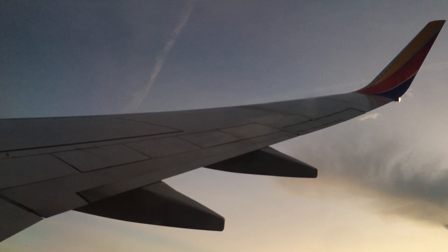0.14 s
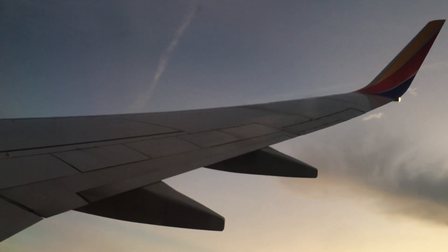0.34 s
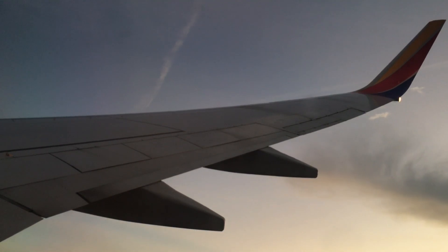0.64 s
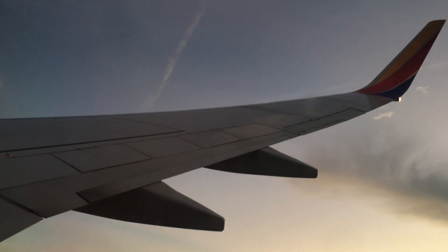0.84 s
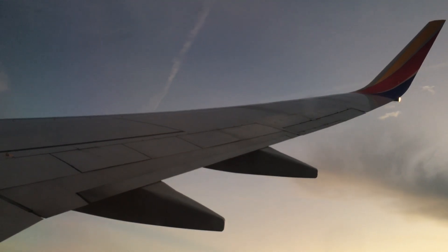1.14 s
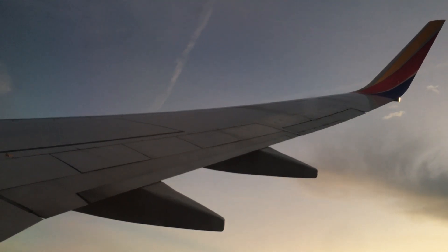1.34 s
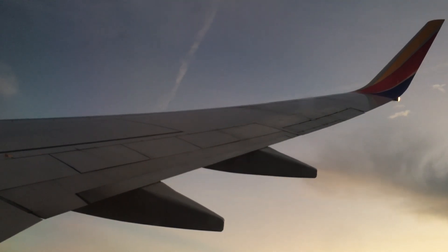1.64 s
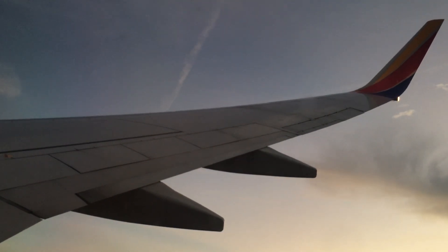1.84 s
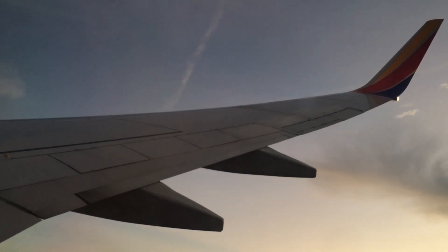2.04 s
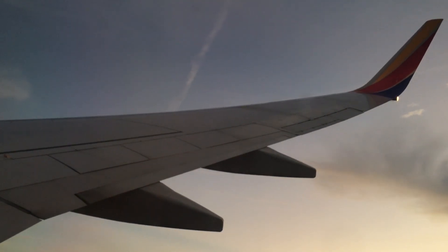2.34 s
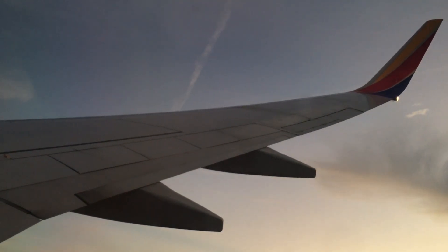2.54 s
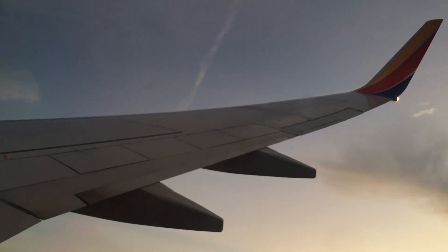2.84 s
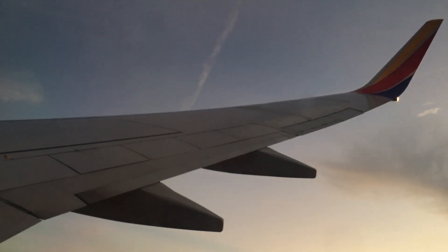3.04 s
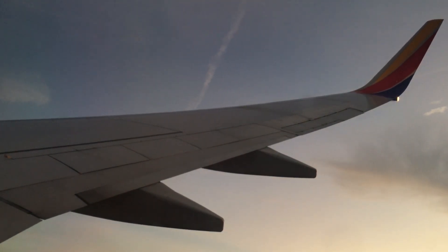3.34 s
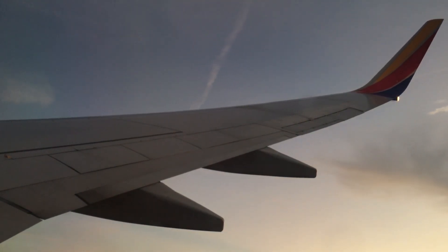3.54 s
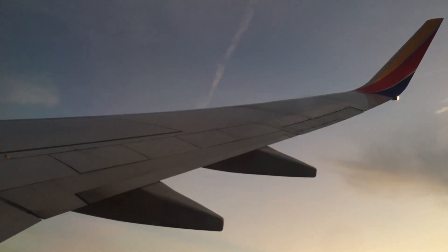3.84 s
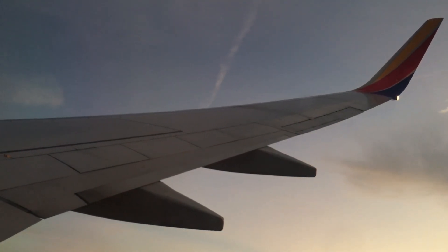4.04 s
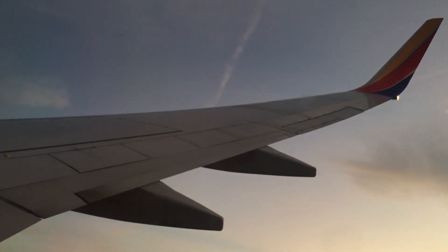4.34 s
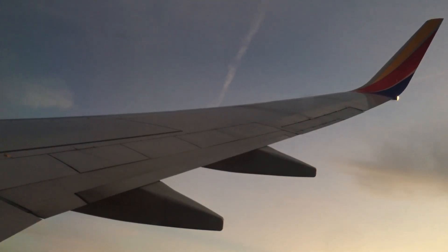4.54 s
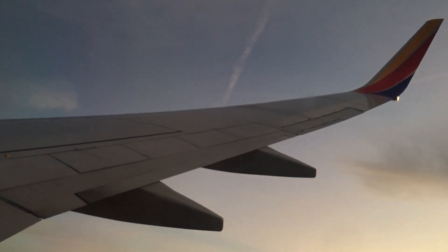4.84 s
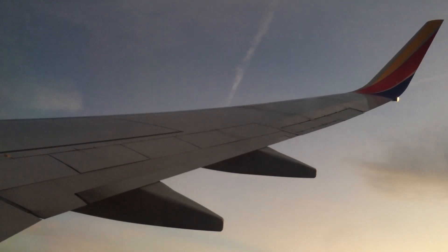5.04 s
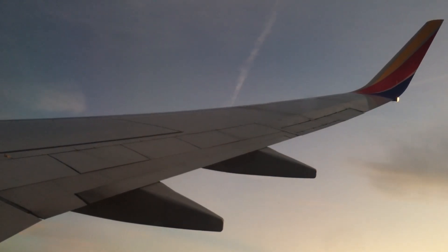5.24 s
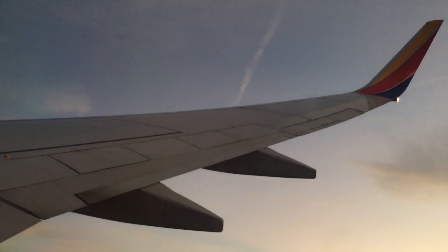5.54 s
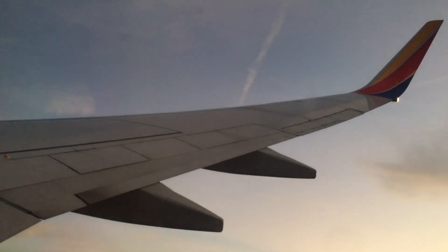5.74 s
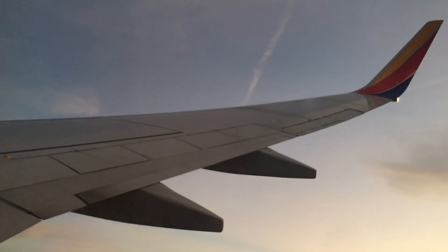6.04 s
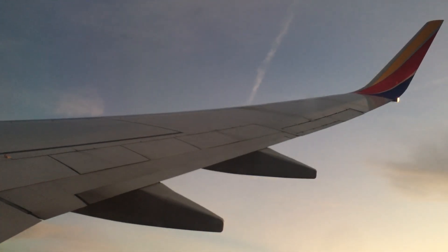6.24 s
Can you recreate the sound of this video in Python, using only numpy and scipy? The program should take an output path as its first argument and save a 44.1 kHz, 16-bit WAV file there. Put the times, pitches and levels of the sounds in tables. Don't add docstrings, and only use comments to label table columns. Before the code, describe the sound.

Constant low jet drone heard close inside an enclosed cabin. Boomy, muffled airflow dominates, mostly below 400 hertz, with restless small buffets and lulls several times a second. Two engine shafts hum almost at the same pitch, pulsing unevenly. A faint airy vent hiss lies far underneath in level, with whines too weak to stand out. The level barely drifts, as on a phone microphone.

```python
import sys
import numpy as np
from scipy import signal
from scipy.fft import rfft, irfft, next_fast_len
from scipy.io import wavfile
from scipy.ndimage import uniform_filter1d

SR = 44100
rng = np.random.default_rng(int(sys.argv[2]) if len(sys.argv) > 2 else 0)


def volts_from_decibels(level):
    exponent = np.asarray(level, float) / 20
    return 10 ** exponent


def store_pcm(level_fs):
    pcm = np.round(np.clip(level_fs, -1, 1) * 32767).astype(np.int16)
    wavfile.write(sys.argv[1], SR, np.atleast_2d(pcm).T)


N = 281358
HANDOVER_HZ = 850


def level(x, db):
    return x * volts_from_decibels(db) / np.sqrt(np.mean(x ** 2))


def walk(rate):
    hold = int(SR / rate)
    steps = np.repeat(rng.standard_normal(N // hold + 1), hold)
    slewed = uniform_filter1d(uniform_filter1d(steps, hold), hold)
    return 0.96 * slewed[:N]


def swells(table):
    rows = np.array(table, float)
    centre, half_length = rows[:, :1], rows[:, 1:2]
    bells = np.exp(-((np.arange(N) / SR - centre) / half_length) ** 2)
    return rows[:, 2:].T @ bells


def noise_bands(shape, modes, edges_hz):
    size = next_fast_len(N + SR)
    hz = np.arange(size // 2 + 1) * SR / size + 1e-3
    shape_hz, shape_db = np.transpose(shape)
    db = np.interp(np.log(hz), np.log(shape_hz), shape_db)
    for centre, width, lift in modes:
        db = db + lift / (1 + (2 * (hz - centre) / width) ** 2)
    spectrum = rfft(rng.standard_normal(size)) * volts_from_decibels(db)
    below = [0] + [1 / (1 + (hz / edge) ** 12) for edge in edges_hz] + [1]
    return np.array([irfft(spectrum * (hi - lo), size)[:N] for lo, hi in zip(below, below[1:])])


def steady(x, hold_s, share):
    hold = int(hold_s * SR)
    power = uniform_filter1d(uniform_filter1d(x ** 2, hold), hold)
    return x * (np.mean(power) / (power + 1e-12)) ** (np.clip(share, 0, 1) / 2)


# f/Hz, density level/dB (per Hz)
VENT_SPECTRUM = [(470, -39), (800, -3), (1060, -5), (1660, -14.5), (3340, -22), (4900, -22.5),
                 (6210, -24.5), (7760, -25), (11500, -28), (15600, -35.5)]
# f/Hz, width/Hz, lift/dB
VENT_MODES = [(1057, 63, 4), (1484, 62, 3), (2370, 170, 3), (2600, 200, -2.5), (3290, 400, 3.5),
              (3470, 100, 0), (3700, 120, 3.5), (4830, 340, -2.5), (6100, 900, 3.5), (7650, 730, -3),
              (8800, 250, -1.5), (9370, 870, 1), (10400, 600, -5.5), (11160, 700, 0)]
# t/s, half length/s, lift/dB
GRILLE_BREATHS = [
    (5.6, 0.28, 1.5),
    (6.3, .15, 1),
]


def vents():
    _, *bands = noise_bands(VENT_SPECTRUM, VENT_MODES, [HANDOVER_HZ, 1600, 3000, 4200, 8000])
    bands[2] = bands[2] * volts_from_decibels(swells(GRILLE_BREATHS)[0])
    hiss = sum(volts_from_decibels(0.35 * walk(7.0) + 0.7 * walk(12.0)) * band for band in bands)
    return level(hiss, -54)


# f/Hz, density level/dB (per Hz)
WALL_SPECTRUM = [(20, -21.5), (32, -12.5), (47, 0), (72, 2), (95, -1), (120, -4), (190, -5), (225, -8.5),
                 (260, -8.5), (345, -10.5), (420, -22.5), (520, -27), (700, -32.5), (900, -30.5)]
# f/Hz, width/Hz, lift/dB
WALL_MODES = [(77, 18, -5), (111, 12.4, 2), (103, 4.3, -2.5), (158.5, 9.9, 6), (176, 23, 2.5),
              (280, 11, 0.5), (293.6, 40.7, 7.5), (316.3, 26.6, 4), (389.2, 16, 6.5), (516, 20, 1.5),
              (542, 46, 2), (645, 45, 3), (724, 31, -4.5)]
BUFFET_EDGES_HZ = [80, 225, 430]
# t/s, half length/s, cabin air lift/dB, panel lift/dB
EDDIES = [(.11, 0.026, 2.5, 1), (.43, 0.029, 4.5, -2.5), (.6, 0.13, -0.5, 2.5), (.71, .025, 2, 2),
          (1.17, 0.069, 3, 0), (1.33, 0.049, 1, -9), (1.85, .025, 4, 2), (2.1, 0.1, 1.5, 1),
          (2.31, .02, -1, -6.5), (2.42, .04, 5.5, 2.5), (2.56, 0.025, -0.5, 4.5), (2.75, 0.053, -3, 4),
          (3.14, .05, -7, -3), (3.37, 0.033, 4, 3.5), (3.7, 0.19, 3, -3), (3.73, 0.036, -2, 4.5),
          (3.89, 0.023, 6, -2), (4.01, 0.024, -9.5, 4), (4.26, 0.022, 3, 0.5), (4.41, .03, 6, 4.5),
          (4.49, 0.019, 4.5, -1), (4.92, 0.042, 4, 1.5), (5.18, 0.037, -6.5, -2), (5.27, .04, -3, 4.5),
          (5.38, 0.044, 2, -1.5), (5.45, .025, -6, 1.5), (5.86, 0.068, 4.5, -3), (6.06, .03, -2, 4),
          (6.2, 0.026, -0.5, 3.5), (6.33, 0.027, 5, 1)]
# t/s, half length/s, hum lift/dB, boom lift/dB
HUM_BOOM_SWELLS = [(.15, 0.045, 2.5, 5.5), (.28, 0.041, -11.5, -2), (0.371, .04, 7.5, 0), (.47, .03, 1, 7.5),
                   (0.719, .03, 7, 8), (.79, .02, -9.5, -6.5), (1.0, 0.027, -8.5, -4.5), (1.22, .05, 5, 2.5),
                   (1.5, .03, 8.5, 0.5), (1.75, .025, 2, 4), (1.832, .04, -5.5, -3), (2.009, 0.036, 11, 9),
                   (2.26, 0.051, 5.5, 2.5), (2.568, .025, 12, 2.5), (2.97, 0.045, 8.5, -2),
                   (3.117, 0.023, 5.5, 7.5), (3.38, 0.034, 2, -5.5), (3.58, .03, -9.5, -6.5), (3.69, .05, 11, -2),
                   (3.993, 0.036, 8, 0), (4.19, 0.021, 2.5, 7), (4.33, 0.035, -6, -3.5), (4.651, 0.022, 9, 6),
                   (4.75, .025, 6, -0.5), (4.88, 0.044, -1, -8), (5.041, 0.026, 10, 5), (5.35, .04, 7, 5.5),
                   (5.76, 0.057, 1.5, 7), (5.929, .03, -7, -7), (6.26, 0.036, 11, -2)]


def fuselage():
    edges_hz = list(BUFFET_EDGES_HZ) + [HANDOVER_HZ]
    boom, cabin, panel, upper, _ = noise_bands(WALL_SPECTRUM, WALL_MODES, edges_hz)
    boom_db = swells(HUM_BOOM_SWELLS)[1]
    cabin_db, panel_db = swells(EDDIES)
    boom = volts_from_decibels(boom_db - 1.5) * steady(boom, 0.078, 0.52)
    cabin = volts_from_decibels(cabin_db - 0.88) * steady(cabin, 0.062, 0.7)
    panel = volts_from_decibels(panel_db - 0.67) * steady(panel, 0.083, 0.29)
    upper = volts_from_decibels(0.67 * walk(3.6)) * upper
    return level(boom + cabin + panel + upper, -20.5)


def fans():
    near_hz, far_hz = 78.80, 77.665
    in_step_s = 0.415
    blades, whine_hz = 24, 1890
    far_db, flutter_db = -10.5, 1.5
    t = np.arange(N) / SR
    near = 2 * np.pi * near_hz * (t - in_step_s) + 0.034 * walk(2.2)
    far = 2 * np.pi * far_hz * (t - in_step_s) + 0.034 * walk(2.2)
    pull = 0.4 * walk(14.0)
    shafts = np.sin(near + pull) + volts_from_decibels(far_db) * np.sin(far + pull)
    hum_db = swells(HUM_BOOM_SWELLS)[0] + flutter_db * walk(16.0)
    sound = level(volts_from_decibels(hum_db) * shafts, -23.5)
    whine = 2 * np.pi * whine_hz * t + 1.7 * walk(3.0)
    # phase, level in dB
    for phase, db in ((blades * near, -81.5), (blades * far, -102), (whine, -87.5)):
        sound = sound + volts_from_decibels(3.0 * walk(1.9)) * level(np.sin(phase), db)
    return sound


def scene():
    return (vents() + fuselage() + fans())[None]


# t/s, level/dB
GAIN = [
    (0.05, -63),
    (0.29, -62),
    (0.62, -63),
    (1.98, -62.5),
    (2.19, -63.5),
    (3.83, -62.5),
    (3.85, -63.5),
    (5.52, -63),
    (6.07, -63),
    (6.3, -63),
]


def gain_control():
    s, db = np.transpose(GAIN)
    db = np.interp(np.arange(N) / SR, s, db)
    return db - 10 * np.log10(np.mean(volts_from_decibels(2 * db)))


def band_limit(x):
    return signal.sosfilt(signal.butter(12, 15710, fs=SR, output="sos"), x)


def record(dry):
    edge_s, edge_start = 0.008, 0.9
    t = np.arange(N) / SR
    opening = t / edge_s + edge_start
    closing = (t[-1] - t) / edge_s
    ends = np.sin(np.pi / 2 * np.clip(np.minimum(opening, closing), 0, 1)) ** 2
    return band_limit(dry * volts_from_decibels(gain_control()) * ends)


dry = scene()
out = record(dry)
store_pcm(out)
```